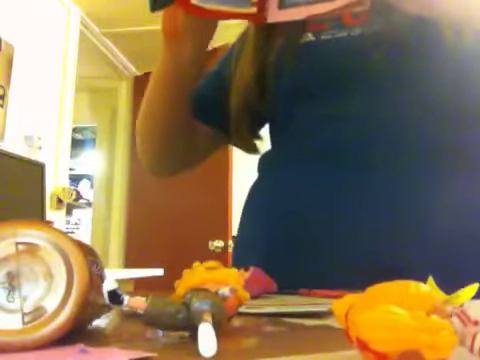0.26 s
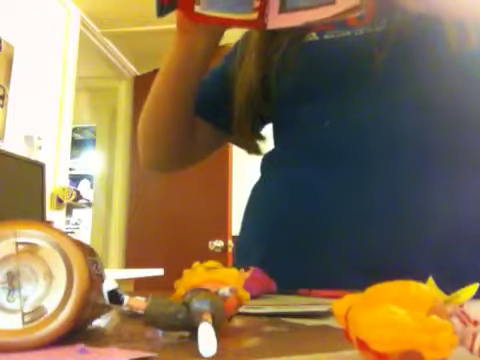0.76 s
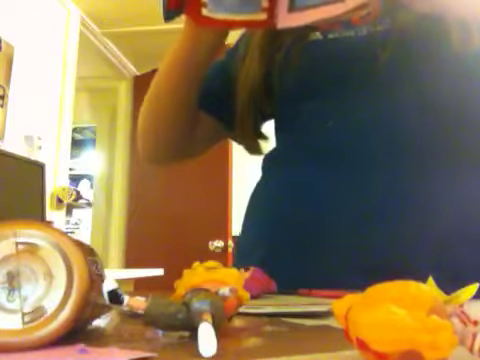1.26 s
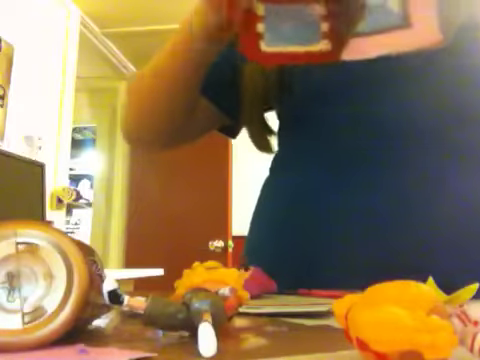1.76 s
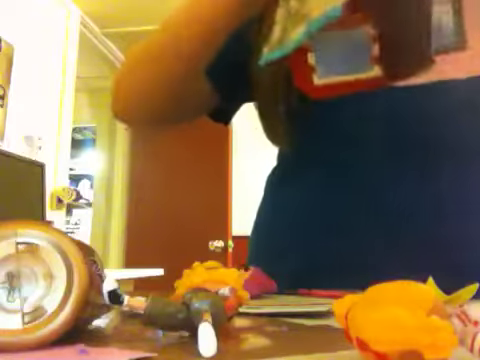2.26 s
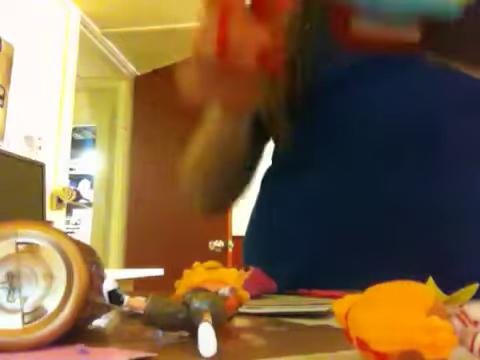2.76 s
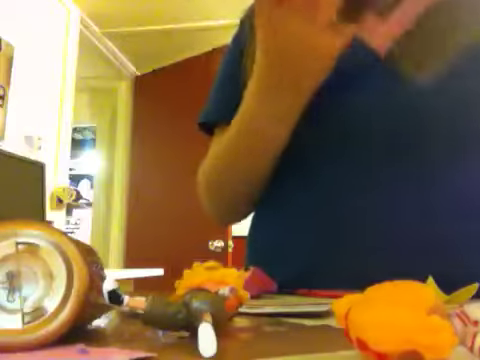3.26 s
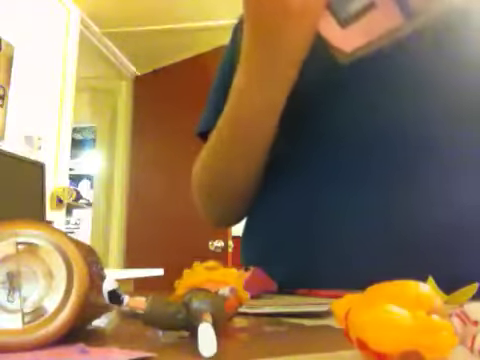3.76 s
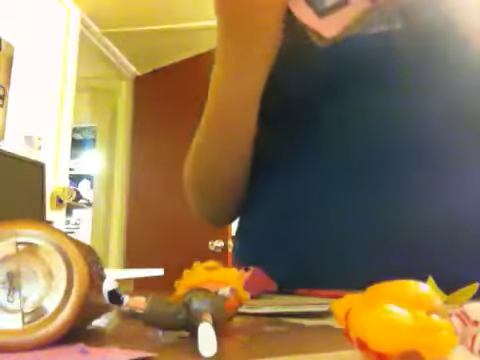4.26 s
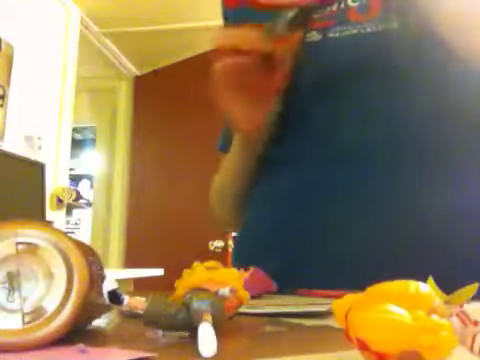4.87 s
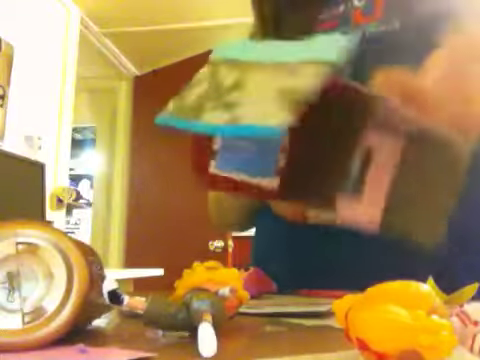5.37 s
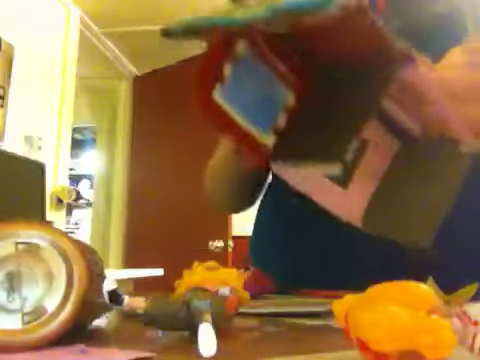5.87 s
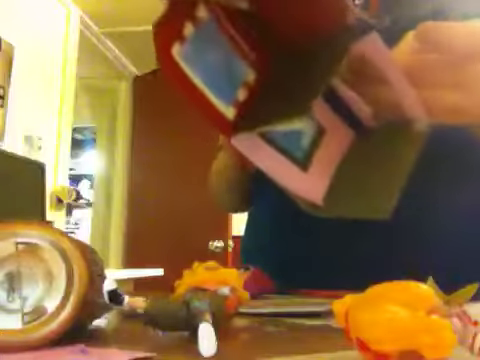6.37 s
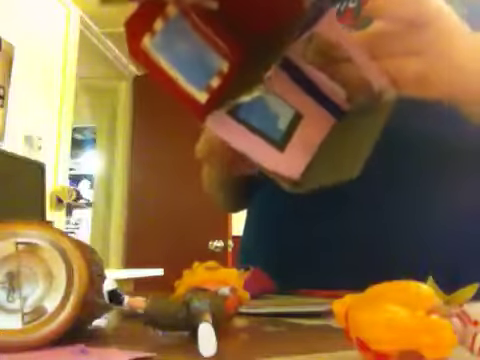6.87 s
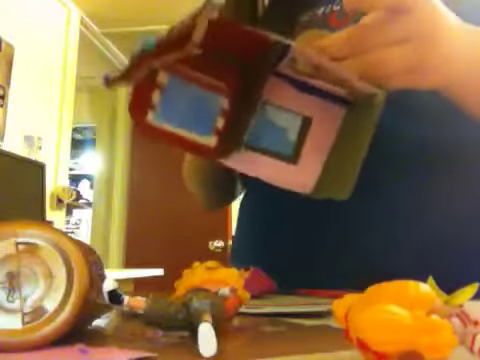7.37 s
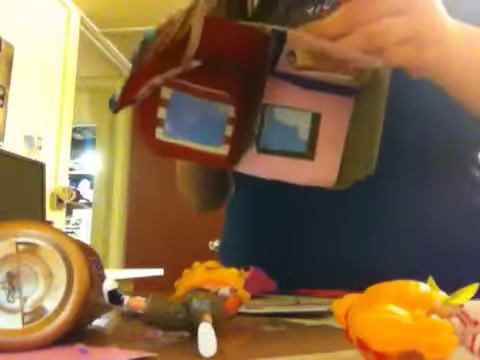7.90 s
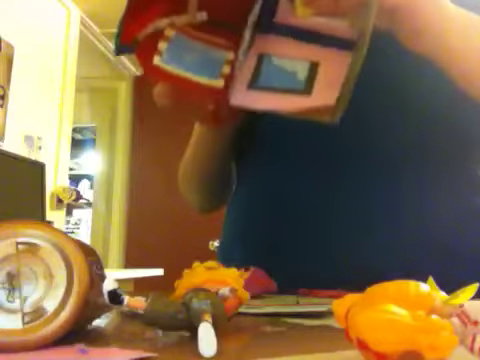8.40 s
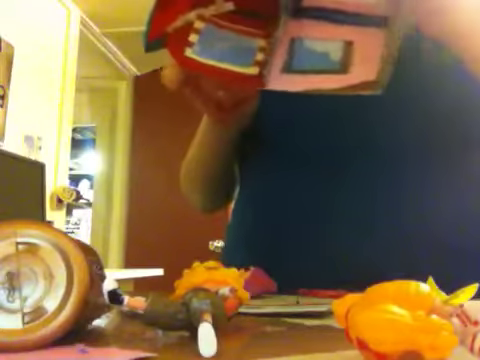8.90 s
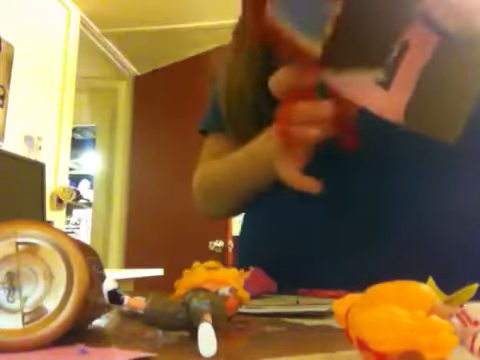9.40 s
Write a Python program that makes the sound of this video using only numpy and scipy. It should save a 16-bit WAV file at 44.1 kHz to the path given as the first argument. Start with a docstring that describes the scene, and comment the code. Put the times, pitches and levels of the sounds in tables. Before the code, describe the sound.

Fingers tap and slide on hollow cardboard, making irregular small knocks, crackles and rustles while a fan hums in a small room.

```python
"""A small cardboard toy house is turned in the hands, close by, in a small room where a fan hums.
Fingers slide over it, their tiny slips hissing on the paper and shaking the walls. Each tap flexes a
wall into a knock and snaps paper fibres into a crack; flaps and panels are left quivering. The hollow
house rings after taps and slides and the room echoes them, over the fan's low tones and rush of air."""
import sys
import numpy as np
from scipy import signal
from scipy.fft import rfft, irfft
from scipy.io import wavfile
from scipy.ndimage import uniform_filter1d

SR = 44100
rng = np.random.default_rng(int(sys.argv[2]) if len(sys.argv) > 2 else 0)


def log_audio(samples):
    """Write samples as a 16-bit WAV file to the path given in sys.argv[1]."""
    # one column per channel
    frames = np.atleast_2d(samples).T
    # limit to full scale, then quantise
    limited = np.clip(frames, -1, 1)
    pcm = np.round(limited * 32767).astype(np.int16)
    wavfile.write(sys.argv[1], SR, pcm)


N = 425124

# The fan's hum. Each row: multiple of the shaft speed, level in dB.
FAN_TONES = [(4, -50), (5, -57), (6, -62), (7, -44), (8, -64.5), (11, -58), (13, -74), (14, -59.5),
             (18, -66.5)]
# The colour of the fan's rushing air. Each row: frequency in Hz, relative level in dB.
FAN_AIR = [(25, -19.5), (60, -8.5), (110, -6), (140, 7.5), (185, 3.5), (215, -1), (300, 2.5), (375, -8),
           (430, -3.5), (520, -3), (720, 5), (850, -5), (1100, -5.5), (1400, -13), (1750, -13),
           (2000, -21.5), (2750, -19.5), (3300, -22.5), (9000, -27), (16000, -34)]
# Strokes of skin or paper. Each row: crest in seconds, length in seconds, wall level in dB, hiss in dB.
STROKES = [(0.106, .13, -42.5, -43.5), (0.588, .17, -49, -47.5), (0.796, 0.11, -48, -53.5),
           (1.021, 0.096, -38, -38.5), (1.219, 0.088, -42.5, -48), (1.705, 0.059, -41.5, -44),
           (2.018, 0.16, -45.5, -51), (2.151, 0.046, -41, -50), (2.478, .11, -45, -46.5),
           (2.666, 0.063, -63, -51.5), (3.077, 0.11, -41.5, -46), (3.163, 0.048, -46, -46.5),
           (3.223, 0.069, -42.5, -46), (3.301, 0.078, -40, -40), (3.464, 0.2, -45, -50),
           (4.175, 0.44, -53, -55), (4.267, .037, -62, -47.5), (4.367, 0.071, -58, -51.5),
           (4.98, 0.26, -61, -58.5), (5.142, 0.083, -44.5, -42), (5.218, 0.14, -50.5, -50),
           (5.685, 0.116, -42, -47), (5.877, 0.12, -46, -51.5), (6.054, 0.62, -60, -59.5),
           (6.327, 0.11, -54.5, -55), (6.769, 0.082, -33, -40), (6.916, 0.027, -35, -47),
           (6.951, .016, -35, -45), (7.655, 0.085, -42.5, -44.5), (7.861, 0.052, -40.5, -47.5),
           (8.043, 0.098, -53, -67), (8.476, 0.014, -40.5, -45), (8.4981, 0.021, -32.5, -37),
           (8.517, 0.019, -40, -34.5), (9.082, 0.22, -50.5, -51), (9.23, 0.22, -53.5, -54)]
# The boxy body of the cardboard walls. Each row: frequency in Hz, relative level in dB.
WALL_EQ = [(40, -47), (120, -32), (330, -5.5), (520, -3), (750, 2), (1200, -2), (1780, 4.5), (2000, -9.5),
           (3200, -30), (8000, -57)]
# The crisp voice of the paper surface. Each row: frequency in Hz, relative level in dB.
PAPER_EQ = [(100, -69), (500, -7.5), (1600, 4.5), (2050, -6.5), (2750, 2.5), (3500, -1), (4600, -0.5),
            (7200, -4), (8600, -4.5), (10600, -9.5), (12000, -15.5), (16000, -24)]
# The paper dulls while the fingers work on the far side of the house.
# Each row: time in seconds, treble tilt in dB per octave.
PAPER_SHADE = [(0, -2.5), (1.4, 3), (2.6, 0.5), (4.4, 2), (4.9, -4.5), (5.7, -5), (6.1, -8), (6.5, 4),
               (7.4, -0.5), (8.5, 2), (9.6, -1)]
# The hollow house's resonances. Each row: frequency in Hz, width in Hz, relative level in dB.
HOUSE_MODES = [(770, 153, -1), (1178, 276, 4), (1700, 57, -4), (2760, 280, 2), (4320, 120, -6),
               (4930, 69, -1), (6120, 120, 0), (8300, 220, -2)]
# The room's tail. Each row: frequency in Hz, time to fall 60 dB in seconds.
ROOM_DECAY = [(250, 0.28), (1000, 0.21), (3000, 0.3), (7000, 0.33), (14000, 0.058)]
# The clear taps. Each row: start in seconds, wall knock in dB, wall pitch in Hz, paper crack in dB.
CLEAR_TAPS = [(.293, -32.5, 620, -38), (.764, -40.5, 895, -46.5), (.982, -65, 890, -46),
              (1.204, -39, 1390, -45), (1.308, -43.5, 855, -48), (1.4808, -27.5, 1090, -22.5),
              (1.59, -38, 925, -42), (1.69, -38, 1140, -42.5), (1.728, -32.5, 726, -36),
              (1.977, -36, 1240, -41.5), (2.16, -31, 820, -37), (2.165, -38, 915, -30),
              (2.458, -37.5, 960, -36), (2.566, -47, 694, -41), (2.915, -41.5, 740, -49.5),
              (3.0269, -30, 1240, -28.5), (3.047, -28.5, 1180, -34), (3.149, -38.5, 1190, -39),
              (3.438, -46, 1070, -44.5), (3.705, -44.5, 1150, -50.5), (4.384, -66, 765, -47.5),
              (4.506, -37.5, 1130, -44.5), (4.716, -45, 830, -46), (4.7825, -52, 790, -44.5),
              (4.866, -36, 1740, -35.5), (5.038, -29, 1020, -35), (5.679, -37, 1640, -49),
              (5.883, -40.5, 1510, -44), (6.466, -46, 1150, -43), (6.769, -32, 900, -38),
              (6.911, -28, 910, -32.5), (6.9445, -34, 810, -42), (6.9668, -19, 1050, -23.5),
              (7.0898, -31.5, 930, -41), (7.368, -51, 830, -42.5), (7.677, -36, 784, -38),
              (7.7877, -32, 1070, -50), (8.5063, -27, 1100, -31.5), (8.647, -40.5, 775, -62),
              (8.68, -40.5, 900, -41.5), (8.838, -52, 800, -35.5), (9.013, -36, 1020, -40),
              (9.17, -39.5, 1030, -39), (9.2904, -27, 744, -40), (9.3455, -33.5, 1190, -35.5),
              (9.531, -31, 1040, -36.5)]
# Panels, flaps and stiff paper edges left quivering by a touch, and the longer tones of a squeaking finger.
# Each row: start in seconds, pitch in Hz, level in dB, decay in seconds.
FLAP_QUIVERS = [(.294, 503, -43, 0.011), (1.479, 6660, -30, 0.0021), (2.166, 2890, -30.5, .0015),
                (2.166, 10400, -31, 0.0014), (3.027, 446, -31, 0.017), (3.027, 1236, -30, .008),
                (3.151, 308, -37.5, .006), (4.506, 2650, -37.5, 0.013), (4.867, 2580, -37, .0023),
                (5.677, 1685, -33.5, 0.032), (6.758, 813, -30, .018), (6.968, 4770, -23, 0.0032),
                (8.5065, 10130, -32, .0015), (8.507, 2800, -32.5, 0.0045), (8.725, 2920, -45.5, .003),
                (9.171, 5160, -39, 0.0023), (9.347, 3280, -39.5, 0.004), (9.532, 426, -34.5, 0.0051),
                (9.533, 1150, -29, 0.0096)]


def amp(db):
    """Turns decibels into gain."""
    return 10 ** (np.asarray(db) / 20)


def unit(x):
    """Scales a sound to rms 1."""
    return x / np.sqrt(np.mean(x ** 2) + 1e-20)


def curve_at(points, hz):
    """Reads a curve on a log-frequency axis."""
    f, value = np.transpose(points)
    return np.interp(np.log(hz + 1), np.log(f + 1), value)


def add(mix, start_s, sound):
    """Drops a sound into the mix."""
    part = mix[max(round(start_s * SR), 0):][:len(sound)]
    part += sound[:len(part)]


def colour(x, eq, tilt_db=0, size=2048):
    """Minimum-phase EQ, with the treble tilted by tilt_db per octave."""
    hz = abs(np.fft.fftfreq(size, 1 / SR))
    octaves = np.log2(np.clip(hz, 2200, 11000) / 5000)
    log_gain = np.log(amp(curve_at(eq, hz) + tilt_db * octaves))
    impulse = np.fft.ifft(np.exp(np.conj(signal.hilbert(log_gain)))).real
    return signal.fftconvolve(x, impulse)[:len(x)]


def drift(rate_hz, size=4096):
    """A smooth random wobble of rms 1."""
    hz = np.fft.rfftfreq(size, N / SR / size)
    slow = irfft(rfft(rng.standard_normal(size)) / (1 + (hz / rate_hz) ** 4))
    return unit(np.interp(np.arange(N), np.linspace(0, N, size), slow))


def burst(x, db):
    """Scales a hit so that its energy, spread over 10 ms, has the level db."""
    return amp(db) * x * np.sqrt(SR / 100 / np.sum(x ** 2))


def fan(shaft_hz=39.4, wander=0.00194, flutter=0.091, air_db=-46, swell_db=.5):
    """A fan hums at multiples of its slightly wavering shaft speed, over a soft rush of air."""
    turns = np.cumsum(shaft_hz * (1 + wander * drift(2.04))) / SR
    hum = np.zeros(N)
    for multiple, db in FAN_TONES:
        waver = 1 + flutter * drift(4.3)
        hum += amp(db) * unit(waver * np.sin(2 * np.pi * (multiple * turns + rng.random())))
    air_gain = amp(curve_at(FAN_AIR, np.fft.rfftfreq(N, 1 / SR)))
    air = irfft(rfft(rng.standard_normal(N)) * air_gain, N)
    return hum + amp(air_db) * unit(air) * amp(swell_db * drift(0.84))


def shifting_resonances(x, depth_db=4.1, size=512):
    """A sliding finger keeps bringing out new resonances of the paper under it."""
    spectrum = signal.stft(x, nperseg=size)[2]
    patches = uniform_filter1d(rng.standard_normal(spectrum.shape), 4, axis=0)
    patches = unit(uniform_filter1d(patches, 7, axis=1))
    return signal.istft(spectrum * amp(depth_db * patches), nperseg=size)[1][:N]


def shade(time_s):
    """The house shades the paper's treble: its tilt at this moment, in dB per octave."""
    return np.interp(time_s, *np.transpose(PAPER_SHADE))


def finger_slides(slips_per_s=2600, catches_per_s=90, judder_db=2.73, rise_share=0.49, ends_db=-16.5):
    """Tiny slips and a few coarser catches hiss on the paper and shake the wall behind it."""
    out = np.zeros(N)
    jolts = amp(2.5 * np.minimum(rng.exponential(1, N), 4)) * rng.choice([-1, 1], N)
    slips = unit(jolts * (rng.random(N) < slips_per_s / SR))
    catches = unit(jolts * (rng.random(N) < catches_per_s / SR))
    friction = shifting_resonances(slips + 0.61 * catches + rng.standard_normal(N))
    friction *= amp(judder_db * drift(120))
    for crest_s, length_s, wall_db, hiss_db in STROKES:
        stroke_s = crest_s + length_s * np.array([-rise_share, 0, 1 - rise_share])
        span = np.arange(max(round(stroke_s[0] * SR), 0), min(round(stroke_s[-1] * SR), N))
        # the hand speeds up to the crest of the stroke, then slows
        from_crest = np.interp(span / SR, stroke_s, [-1, 0, 1])
        speed = amp(ends_db * from_crest ** 2) * signal.windows.tukey(len(span), .12)
        tilt_db = shade(crest_s) + 0.45 + 0.4 * (hiss_db - wall_db)  # hissier strokes are brighter
        wall = amp(wall_db) * unit(colour(friction[span], WALL_EQ))
        hiss = amp(hiss_db) * unit(colour(friction[span], PAPER_EQ, tilt_db))
        out[span] += speed * (wall + hiss)
    return out


def hollow_house(x, ring_db, direct_db, size=4096):
    """The hollow house rings briefly after whatever touches it."""
    t = np.arange(size) / SR
    ring = np.zeros(size)
    for hz, width_hz, db in HOUSE_MODES:
        gain = amp(db) * 2 * np.pi * width_hz / SR
        ring += gain * np.exp(-np.pi * width_hz * t) * np.cos(2 * np.pi * hz * t)
    return amp(direct_db) * x + amp(ring_db) * signal.oaconvolve(x, ring)[:N]


def room(x, early_db=-10, reflections_per_s=3000, early_decay_s=0.0036, tail_db=-13):
    """Quick reflections off the table and the body, then the room's tail; wet signal only."""
    t = np.arange(SR // 2) / SR
    near, far = rng.standard_normal((2, len(t)))
    arrivals = (rng.random(len(t)) < reflections_per_s / SR) * (t > .002)
    early = near * arrivals * np.exp(-t / early_decay_s)
    hz, frame_s, spectrum = signal.stft(far * (1 - np.exp(-t / 0.0011)), SR, nperseg=256)
    fade = amp(-60 * frame_s / curve_at(ROOM_DECAY, hz)[:, None])
    tail = signal.istft(spectrum * fade, SR, nperseg=256)[1][:len(t)]
    echoes = amp(early_db) * early / np.linalg.norm(early) + amp(tail_db) * tail / np.linalg.norm(tail)
    return signal.oaconvolve(x, echoes)[:N]


def finger_taps(rows, contact_cycles=2.36, scatter_db=2.5, thump_db=-14, thump_hz=260, size=3000):
    """A finger scuffs and lands: the wall flexes briefly while fibres snap in a quick volley."""
    out = np.zeros(N)
    clock = np.arange(size) / SR - .008  # the scuff leads into the landing at zero
    t = np.maximum(clock, 0)
    scuff = amp(-22) * np.exp(-abs(clock) / 0.0017)
    # the wall also pushes on the air inside the house
    thump = np.sin(2 * np.pi * thump_hz * t) * (1 - np.exp(-t * thump_hz)) * np.exp(-t / 0.0018)
    for start_s, knock_db, hz, crack_db in rows:
        # a firm nail gives a short, bright crack; a soft fingertip stays longer and mostly knocks
        hardness_db = crack_db - knock_db
        contact_s = contact_cycles / hz * amp(-0.32 * hardness_db)
        swell_s = 0.26 * contact_s
        flex = (t / swell_s) ** 2 * np.exp(-2 * t / swell_s) * np.sin(2 * np.pi * hz * (t - swell_s))
        fibres, scatter, creases = rng.standard_normal((3, size))
        snap_shape = (1 - np.exp(-t / 0.00069)) * np.exp(-t / (1.6 * contact_s))
        volley = fibres * amp(scatter_db * scatter) * (scuff + snap_shape)
        buckle = creases * (scuff + t / swell_s * np.exp(-t / (2.8 * swell_s)))
        knock = colour(unit(flex) + unit(buckle), WALL_EQ)
        crack = colour(volley, PAPER_EQ, shade(start_s) + 0.05 * hardness_db)
        tap = burst(knock, knock_db) + burst(crack, crack_db) + burst(thump, knock_db + thump_db)
        add(out, start_s + clock[0], tap)
    return out


def quivering_flaps(chafe_depth=.08, size=3000):
    """A loose flap, panel or edge swings and dies quickly, or a finger squeaks a little longer; the pitch stays
    unsteady as it chafes."""
    out, t = np.zeros(N), np.arange(size) / SR
    for start_s, hz, db, decay_s in FLAP_QUIVERS:
        chafe = unit(uniform_filter1d(rng.standard_normal(size), max(round(2 * SR / hz), 1)))
        cycles = np.cumsum(hz * (1 + chafe_depth * chafe)) / SR
        envelope = (1 - np.exp(-2 * hz * t)) * np.exp(-t / decay_s)
        add(out, start_s, burst(np.sin(2 * np.pi * cycles) * envelope, db))
    return out


def grip_touches(per_s=2.5, knock_db=-49.5, hz=970, crack_db=-58, spread_db=2.2, count=60):
    """The shifting grip lands faint taps at random moments; returns rows like the clear taps."""
    when, chance = rng.random((2, count))
    knock, pitch, crack = rng.standard_normal((3, count))
    rows = np.transpose([when * N / SR, knock_db + spread_db * knock,
                         hz * np.exp(.2 * pitch), crack_db + spread_db * crack])
    return list(rows[chance < per_s * N / SR / count])


def scene(sides=3):
    """The handled house in the room, over the fan; rubbing rings it more than tapping does."""
    hum = fan()
    rubbing = hollow_house(finger_slides(), ring_db=-0.5, direct_db=-2.0)
    # each side of the house throws its own version of a tap into the room
    reverb = sum(room(finger_taps(CLEAR_TAPS)) for _ in range(sides)) / np.sqrt(sides)
    reverb += amp(-5.5) * room(rubbing)
    flaps = quivering_flaps()
    taps = finger_taps(list(CLEAR_TAPS) + grip_touches())
    tapping = hollow_house(taps, ring_db=-8.0, direct_db=-4.0)
    return (tapping + rubbing + flaps + reverb + hum)[None]


def record(dry, cutoff_hz=16100):
    """A steep low-pass trims the very top of the mix."""
    lowpass = signal.firwin(511, cutoff_hz, window=("kaiser", 9), fs=SR)
    return signal.oaconvolve(dry, lowpass[None], "same")


dry = scene()
out = record(dry)
log_audio(out)
```